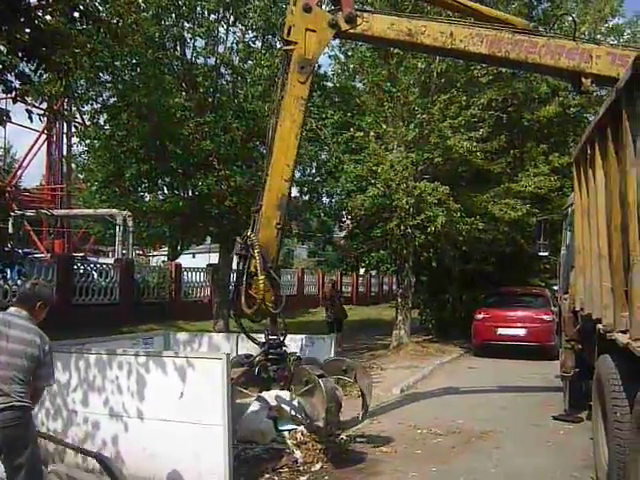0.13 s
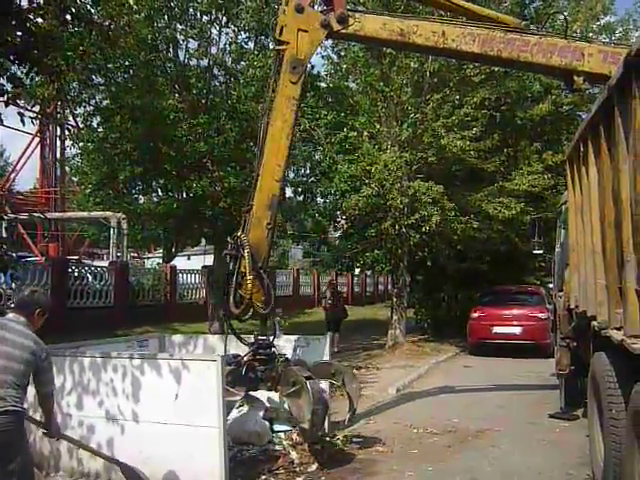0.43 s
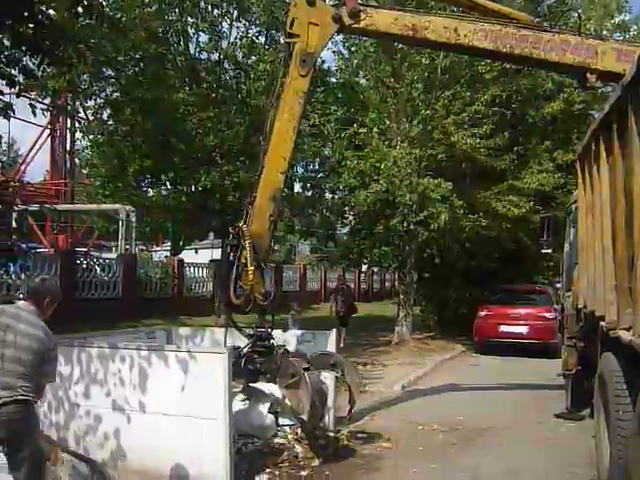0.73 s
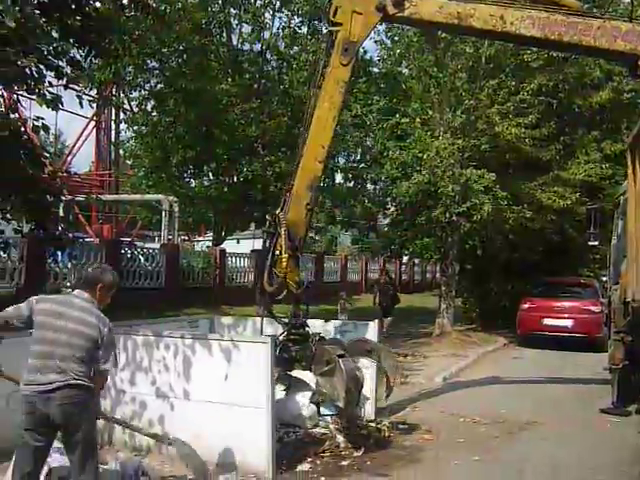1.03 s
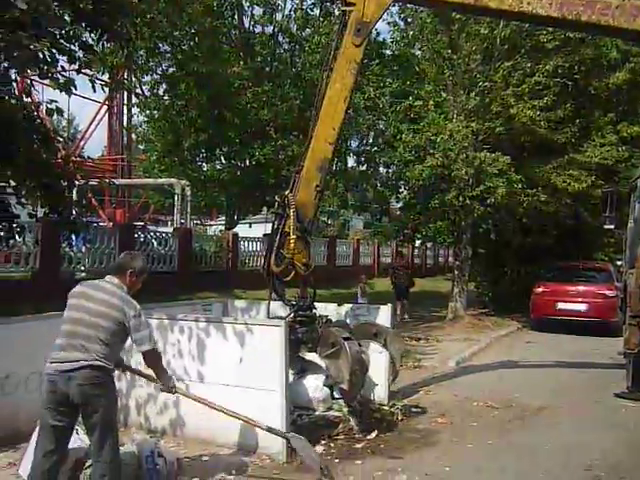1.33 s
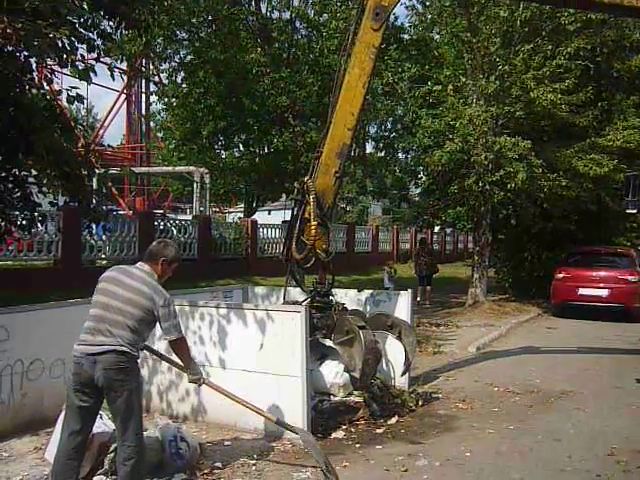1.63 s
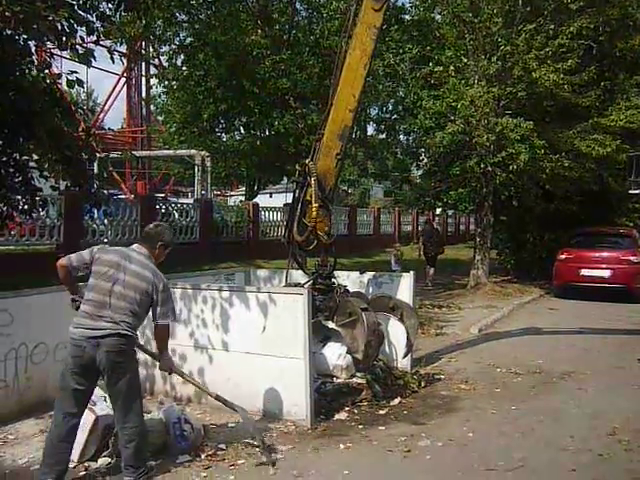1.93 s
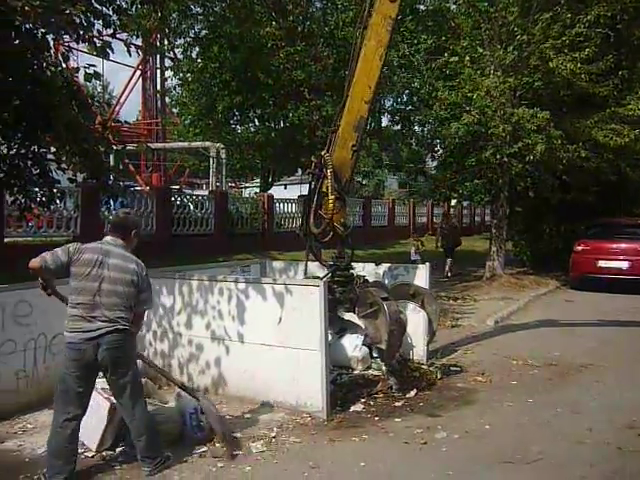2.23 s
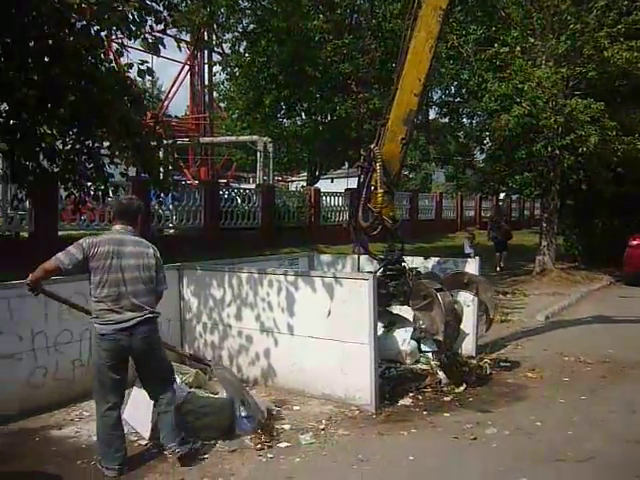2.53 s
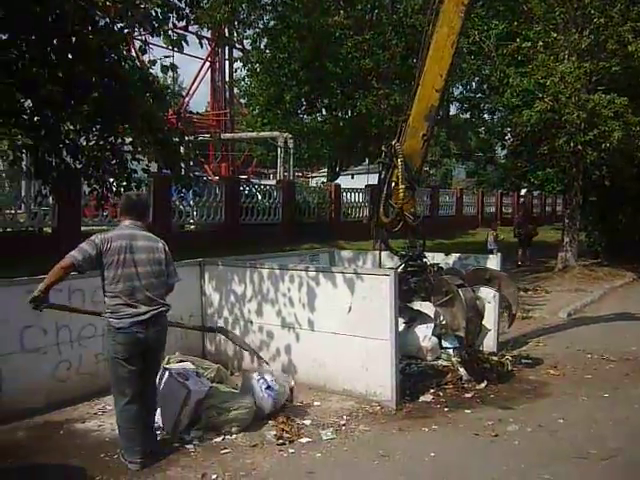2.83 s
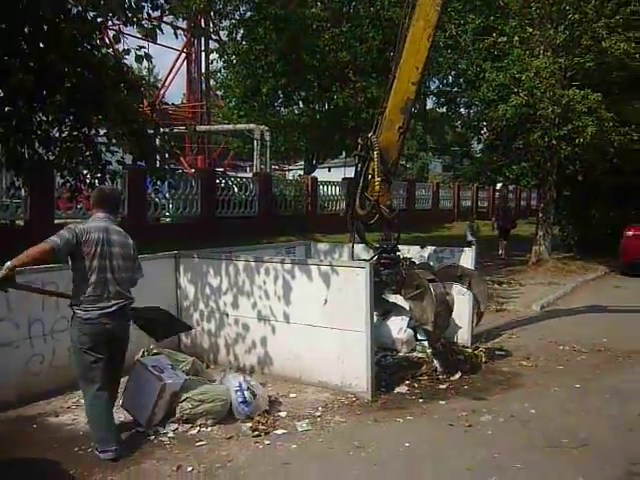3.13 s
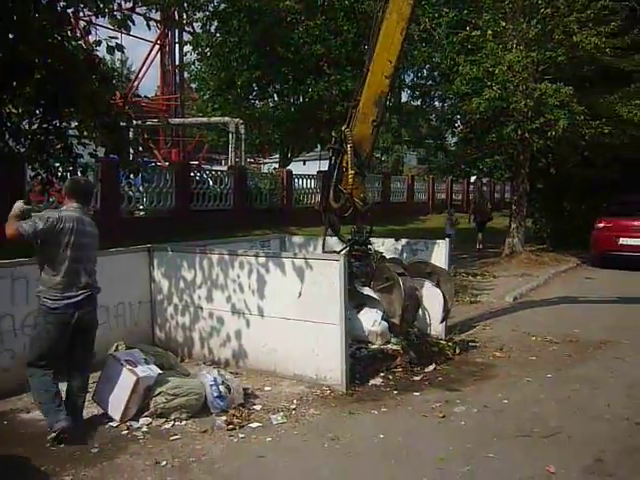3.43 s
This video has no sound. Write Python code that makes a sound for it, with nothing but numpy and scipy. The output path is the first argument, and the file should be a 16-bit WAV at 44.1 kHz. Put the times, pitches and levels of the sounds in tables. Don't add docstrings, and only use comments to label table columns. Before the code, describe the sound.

Steel shovel scrapes rough pavement twice, stones snapping, over a steady truck idle and wind thumps.

```python
import sys
import numpy as np
from scipy import signal
from scipy.io import wavfile
from scipy.ndimage import uniform_filter1d

SR = 44100
rng = np.random.default_rng(int(sys.argv[2]) if len(sys.argv) > 2 else 0)


def invert_db(x):
    u = np.asarray(x, float) / 20
    return 10 ** u


def transcribe(u):
    v = np.clip(np.atleast_2d(u).T, -1, 1)
    q = np.round(v * 32767).astype(np.int16)
    wavfile.write(sys.argv[1], SR, q)


N = 157437
TIME = np.arange(N) / SR


def rms_one(x):
    return x / np.sqrt(np.mean(x ** 2) + 1e-20)


def butter(x, order, hz, kind="low"):
    return signal.sosfilt(signal.butter(order, hz, kind, fs=SR, output="sos"), x)


def drift(rate):
    r = np.exp(-80 * np.pi * rate / SR)
    slow = signal.lfilter([1], [1, -2 * r, r * r], rng.standard_normal(N // 40 + 2002))
    slow = slow[2000:]
    return np.interp(np.arange(N) / 40, np.arange(len(slow)), rms_one(slow - slow.mean()))


def resonance(x, hz, width_hz):
    r = np.exp(-np.pi * width_hz / SR)
    zeros = np.array([1, 0, -1]) * (1 - r * r) / 2
    poles = [1, -2 * r * np.cos(2 * np.pi * hz / SR), r * r]
    return signal.lfilter(zeros, poles, x + 1e-18)


def struck(clicks, hz, width_hz):
    return resonance(clicks, hz, width_hz) * SR / (np.pi * width_hz)


def swell(start, length):
    phase = np.clip((TIME - start) / length, 0, 1)
    return np.sqrt(np.abs(np.sin(np.pi * phase)))


def grains(rate, spread):
    sizes = invert_db(spread * np.minimum(rng.exponential(1, N), 5)) * rng.choice([-1, 1], N)
    return sizes * (rng.random(N) < rate / SR)


def grit_clicks():
    return rms_one(grains(rate=6000, spread=2.4))


def bands(sources, spectrum, gain_db):
    out = 0
    edges = 40 * 2 ** np.arange(0, 8.1, 1 / 3)
    hz_points, db_points = np.transpose(spectrum)
    for k, (low, high) in enumerate(zip(edges, edges[1:])):
        hz = np.sqrt(low * high)
        band = butter(sources[k % len(sources)], 2, [low, high], "band")
        level_db = np.interp(np.log(hz), np.log(hz_points), db_points) + gain_db(hz)
        out = out + invert_db(level_db) * band
    return out


# start in seconds, level in dB, rise in seconds,
# fall in dB per second, brightness in dB per octave.
BLADE_SKIPS = [(-.006, -24, 0.0017, 294, -2), (0.443, -18.5, 0.0053, 160, -3), (0.46, -21, .006, 400, -2),
               (0.529, -18, 0.011, 195, -4.5), (0.607, -14, 0.0022, 157.5, -2),
               (0.671, -16, 0.0083, 220.5, -4), (1.28, -41.5, 0.13, 16.5, -1.5),
               (1.513, -24.5, 0.0033, 240, -4.5), (1.569, -17, 0.013, 185, -4.5),
               (1.646, -13.5, 0.028, 179, -3.5), (1.719, -14, 0.023, 64.5, -2.8),
               (1.836, -19, 0.019, 79, -2.5), (1.934, -17, 0.024, 68.5, -3), (2.025, -20.5, 0.004, 115, -3),
               (2.093, -22.5, 0.0036, 101, -3.5), (2.135, -19.5, 0.0044, 161, -2.5),
               (2.22, -20.5, 0.0082, 264.5, -2), (2.287, -22.5, 0.0073, 299.5, -1.8)]
# frequency in Hz, level in dB per Hz.
GRIT_SPECTRUM = [(300, -51), (600, -15.5), (870, -17.5), (2000, -9.5), (3000, -7), (5300, -8), (7300, -7),
                 (9000, -30.5)]
# frequency in Hz, width in Hz, level in dB.
SHEET_MODES = [(882, 60, -4), (1252, 54, 2), (1750, 73, -2), (2184, 40, 3), (2518, 60, -4), (3330, 63, 0),
               (3670, 220, -11.5), (4600, 200, -15.5)]


def scrape():
    hold_s = 0.018
    power, tilt = 1e-12, 0
    for start, db, rise, fall, bright in BLADE_SKIPS:
        since = TIME - start
        decay = invert_db(db - fall * np.maximum(since - rise - hold_s, 0))
        onset = np.clip(since / max(rise, 1e-3), 0, 1)
        skip = decay ** 2 * onset ** 2
        power = power + skip
        tilt = tilt + skip * bright
    brightness = tilt / power

    def grit_gain(hz):
        return brightness * np.log2(hz / 2500) + 1 * drift(25)

    grit = [grit_clicks() for _ in range(3)]
    body = rms_one(bands(grit, GRIT_SPECTRUM, grit_gain))
    ring = 0
    for k, (hz, width_hz, db) in enumerate(SHEET_MODES):
        wander_db = 3 * drift(17)
        ring = ring + invert_db(db + wander_db) * (-1) ** k * rms_one(resonance(body, hz, width_hz))
    return np.sqrt(power) * rms_one(body + invert_db(-9) * rms_one(ring))


# start in seconds, length in seconds, level in dB, frequency in Hz, width in Hz.
SINGING_AREAS = [(-.01, 0.024, -26, 940, 200), (0.48, 0.041, -25.5, 1120, 400),
                 (0.523, 0.13, -31, 2950, 600), (0.615, 0.037, -30, 4500, 900),
                 (0.655, 0.03, -26.5, 1370, 295), (0.672, 0.056, -22, 3050, 450),
                 (1.568, 0.042, -23, 780, 450), (1.66, .03, -25, 4800, 800), (1.643, 0.037, -27, 1750, 250),
                 (1.698, 0.075, -25.5, 3650, 800), (1.926, .06, -32, 4000, 600),
                 (2.034, 0.081, -30, 875, 246), (2.08, 0.029, -28.5, 1250, 199),
                 (2.12, .14, -32, 1600, 500), (1.875, 0.077, -29, 2400, 300), (3.303, 0.12, -31, 700, 250),
                 (3.1, .18, -35, 750, 250), (0.457, 0.032, -28.5, 3350, 500), (.535, .02, -26, 6400, 700),
                 (.608, 0.028, -21, 6680, 500), (0.617, .03, -28, 4100, 302), (.63, .03, -23, 5230, 504),
                 (.69, 0.0254, -33, 5800, 800), (0.597, 0.078, -30, 2900, 402),
                 (0.542, 0.063, -34, 1720, 403), (1.583, .03, -25, 4700, 500),
                 (1.605, 0.035, -30, 2620, 300), (1.725, .05, -30, 5150, 600),
                 (1.75, 0.048, -28, 1700, 250), (1.87, .03, -30, 1160, 198), (2.033, 0.079, -28, 1250, 199),
                 (2.117, 0.025, -24, 770, 250), (2.217, .03, -31, 3930, 400), (2.293, .03, -35, 3380, 296),
                 (2.17, .04, -35, 1500, 400), (2.008, .05, -29, 5800, 1500), (2.1, .03, -29, 6750, 900)]


def singing():
    grit, out = grit_clicks(), 0
    for start, length, db, hz, width_hz in SINGING_AREAS:
        tone = rms_one(resonance(resonance(grit, hz, width_hz), hz, width_hz))
        out = out + invert_db(db) * swell(start, length) * tone
    return out


def sheet():
    rasp = scrape()
    flatter = (TIME > 0.57) & (TIME < 0.8)
    dead_share = np.where(flatter, 0.83, 0.34)
    rasp = rasp - dead_share * resonance(rasp, 2210, 840)
    judder = invert_db(0.9 * drift(110))
    return butter((rasp + singing()) * judder, 4, 650, "high")


# time in seconds, peak in dB.
EDGE_KNOCKS = [
    (0.445, -13),
    (0.61, -28.5),
    (1.514, -12),
    (1.574, -17),
    (1.583, -13),
    (1.935, -15.5),
]
# time in seconds, peak in dB.
STONE_SNAPS = [(.447, -12), (.62, -11), (.65, -15), (1.583, -5), (1.591, -13), (1.703, -15), (1.74, -12),
               (1.762, -13), (1.771, -13), (1.808, -16), (1.854, -15), (1.884, -16), (1.917, -15),
               (1.978, -9), (1.992, -15), (2.034, -16), (2.067, -13), (2.111, -14), (2.157, -12),
               (2.232, -16), (2.315, -18)]


def knocks():
    crack_s = 0.0044
    clicks, snaps = np.zeros(N), np.zeros(N)
    for start, db in EDGE_KNOCKS:
        clicks[int(start * SR)] = invert_db(db)
    for start, db in STONE_SNAPS:
        snaps[int(start * SR)] = invert_db(db) * rng.choice([-1, 1])
    thud = struck(clicks, 448, 280)
    crack = signal.lfilter([1], [1, -np.exp(-1 / (crack_s * SR))], clicks) * rng.standard_normal(N)
    crack = butter(crack, 2, [700, 8600], "band")
    return 0.75 * crack + invert_db(-4.5) * thud + struck(snaps, 3000, 3500)


def yard(x):
    t60_s, first_echo_s = 0.3, 0.008
    t = np.arange(SR // 2) / SR
    tail = rng.standard_normal(len(t)) * invert_db(-60 * t / t60_s) * (t > first_echo_s)
    tail = butter(tail, 1, 1900)
    tail = tail / np.sqrt(np.sum(tail ** 2))
    return invert_db(-14.5) * signal.fftconvolve(x, tail)[:N]


# frequency in Hz, half width in Hz, level in dB.
EXHAUST_MODES = [(172, 49, 1), (346, 52, -9), (422, 12, -5), (682, 10, -10), (800, 25, -9.5),
                 (1180, 28, -16)]


def exhaust():
    cycle_hz, jitter, cylinder_db, firing_db = 10.38, 0.036, 6.5, 1.32
    k = np.arange(int(N / SR * 12 * 8))
    draw = rng.standard_normal((len(k), 2))
    pattern = rng.standard_normal(8)
    at = ((k + 1 + jitter * draw[:, 0]) / (8 * cycle_hz) * SR).astype(int)
    strength = invert_db(cylinder_db * pattern[k % 8] + firing_db * draw[:, 1])
    clicks = np.zeros(N)
    clicks[at[at < N]] = strength[at < N]
    out = 0
    for j, (hz, width_hz, db) in enumerate(EXHAUST_MODES):
        out = out + invert_db(db) * (-1) ** j * rms_one(resonance(clicks, hz, 2 * width_hz))
    return invert_db(-35.5) * rms_one(out)


# frequency in Hz, level in dB.
ENGINE_HUMS = [(52, -41), (93, -40), (166.2, -36), (229.5, -37), (270, -38.5), (453, -72), (519, -41.5),
               (645.5, -42), (1142, -49.5), (1890, -56)]


def hums():
    out = 0
    for hz, db in ENGINE_HUMS:
        level = invert_db(db + 1.5 + 3 * drift(6.0))
        slip = 1.3 * drift(2.7)
        out = out + level * np.sin(2 * np.pi * hz * TIME + slip)
    return out


# frequency in Hz, level in dB per Hz.
ROAR_SPECTRUM = [(35, -32.5), (60, -12.5), (160, -2.5), (270, -6.5), (350, -12.5), (520, -12), (900, -12.5),
                 (1500, -32)]
# frequency in Hz, level in dB per Hz.
FAN_HISS_SPECTRUM = [(500, -37.5), (1050, -3.5), (1500, -5.5), (1900, -9), (2150, -10), (5000, -19.5),
                     (7200, -25.5), (9000, -45.5)]


def engine_noise():
    patchy_db = 1.22
    white = rng.standard_normal((7, N))
    roar = bands(white[1:4], ROAR_SPECTRUM, lambda hz: patchy_db * drift(3.7))
    hiss = bands(white[4:], FAN_HISS_SPECTRUM, lambda hz: patchy_db * drift(7.1))
    pump = white[0] * invert_db(1.5 * drift(13))
    whine = resonance(resonance(pump, 1880, 160), 1880, 160)
    gear = resonance(resonance(white[1], 3550, 500), 3550, 500)
    out = invert_db(-28) * rms_one(roar) + invert_db(-37) * rms_one(hiss)
    return out + invert_db(-45) * rms_one(whine) + invert_db(-53) * rms_one(gear)


# start in seconds, length in seconds, share 0-1.
WORKER_SCREENS = [
    (.62, 0.21, 0.48),
    (1.67, 0.27, 0.7),
]


def truck():
    engine = exhaust() + hums() + engine_noise()
    screen = sum(share * swell(start, length) for start, length, share in WORKER_SCREENS)
    return engine - screen * resonance(engine, 453, 450)


# time in seconds, level in dB.
GUST_LEVEL = [(0, -50), (.35, -36.5), (.6, -29), (.8, -42), (.95, -35), (1.2, -35), (1.5, -32.5),
              (1.7, -32.5), (1.85, -42), (2.1, -33), (2.35, -36), (2.6, -42), (2.9, -33), (3.1, -37.5),
              (3.4, -27.5), (3.57, -36.5)]
# time in
# seconds, peak in dB, pitch in Hz.
LOW_THUMPS = [(2.764, -10, 233), (2.908, -12, 170), (2.941, -14, 230), (3.033, -13, 229), (3.048, -9, 235),
              (3.206, -27, 246), (3.269, -16, 220), (3.333, -16, 238), (3.346, -10, 226),
              (3.379, -10.5, 220), (3.395, -13, 235), (3.405, -16, 230), (3.432, -10, 197),
              (3.454, -9, 190), (3.494, -13, 149), (3.566, -13, 160), (0.207, -24, 220), (1.047, -14, 200),
              (1.458, -11, 190), (1.516, -21.5, 260), (1.541, -15, 240), (1.57, -17, 150), (.61, -20, 280),
              (2.482, -21, 280), (3.152, -16, 232), (1.934, -10, 390), (.447, -18, 242)]


def wind():
    puff_hz, width_hz = 195, 176
    thump_cycles, sharpness, lean = 1.05, 1.35, 0.83
    puffs = grains(rate=250, spread=0.52) * invert_db(0.69 * drift(8.2))
    puffs = resonance(resonance(puffs, puff_hz, width_hz), puff_hz, 2 * width_hz)
    puffs = butter(puffs, 2, 500)
    out = invert_db(np.interp(TIME, *np.transpose(GUST_LEVEL))) * rms_one(puffs)
    for start, db, hz in LOW_THUMPS:
        cycles = (TIME - start) * hz
        pulse = np.exp(-np.abs(2 * cycles / thump_cycles) ** sharpness)
        out = out + invert_db(db) * pulse * np.cos(2 * np.pi * cycles - lean)
    return out


def scene():
    shovel = sheet() + knocks()
    return (shovel + yard(shovel) + truck() + wind())[None]


def gain_control(dry):
    threshold_db, share, attack_s, release_db_per_s = -28.5, 0.45, 0.041, 20
    sensed = butter(dry[0], 2, 700, "high")
    level = 10 * np.log10(uniform_filter1d(sensed ** 2, size=441) + 1e-12)
    slope = release_db_per_s * TIME
    wanted_cut = share * np.maximum(level - threshold_db, 0)
    cut = np.maximum.accumulate(wanted_cut + slope) - slope
    r = np.exp(-1 / (attack_s * SR))
    return dry * invert_db(-signal.lfilter([1 - r], [1, -r], cut))


def top_cut(x):
    return signal.sosfilt(signal.butter(12, 9190, fs=SR, output="sos"), x)


def record(dry):
    x = gain_control(dry)
    x = x + invert_db(-46.5) * rms_one(butter(rng.standard_normal(N), 1, 4000))
    x = butter(x, 3, 57.7, "high")
    x = butter(x, 3, 7740)
    top = signal.sosfiltfilt(signal.butter(4, 7500, "high", fs=SR, output="sos"), x)
    flicker = invert_db(5 * (drift(150) - 1))
    x = x + (flicker - 1) * top
    x = signal.sosfilt(signal.cheby2(10, 60, 9780, fs=SR, output="sos"), x)
    mix = x - 0.0391
    return top_cut(mix)


dry = scene()
out = record(dry)
transcribe(out)
```